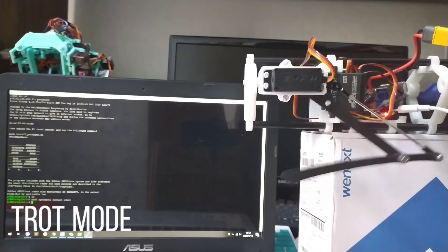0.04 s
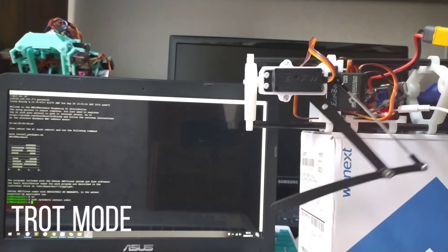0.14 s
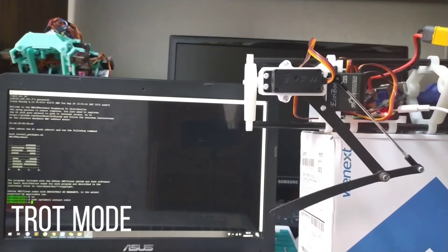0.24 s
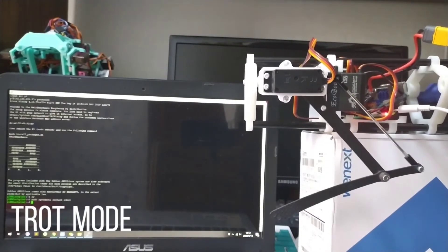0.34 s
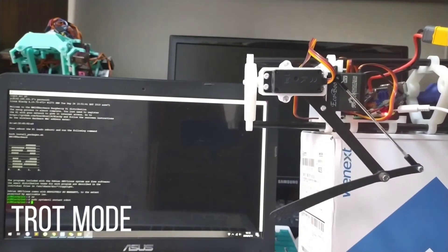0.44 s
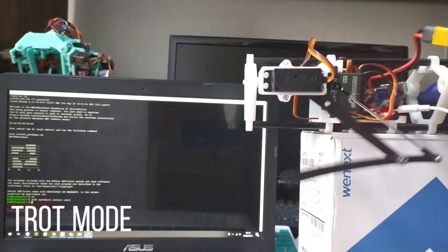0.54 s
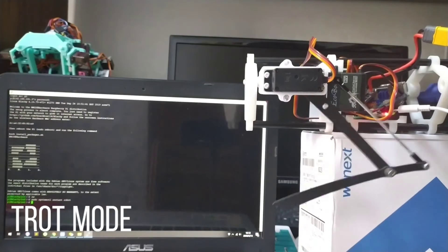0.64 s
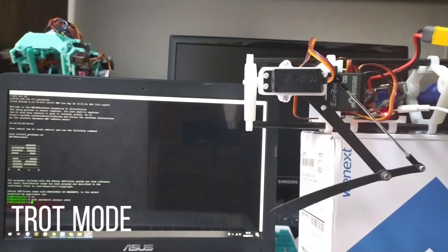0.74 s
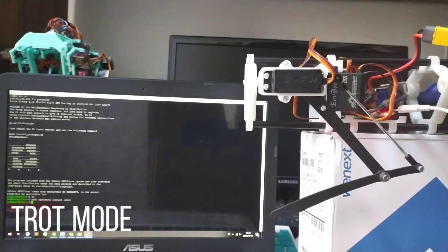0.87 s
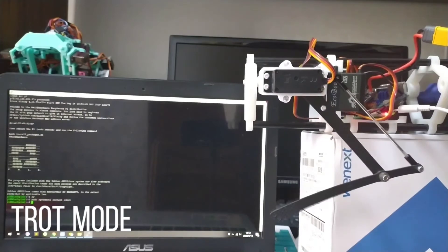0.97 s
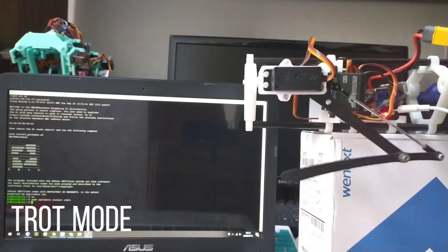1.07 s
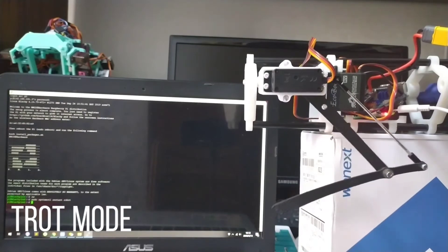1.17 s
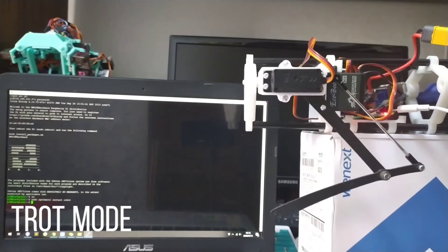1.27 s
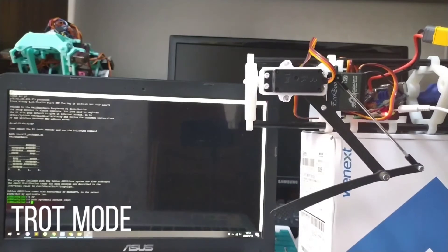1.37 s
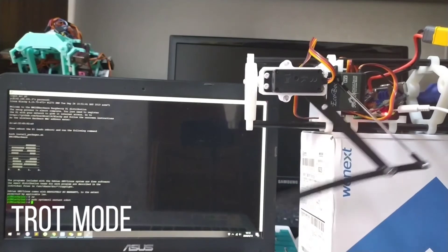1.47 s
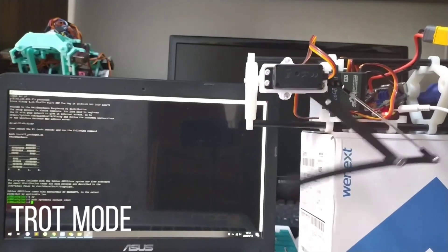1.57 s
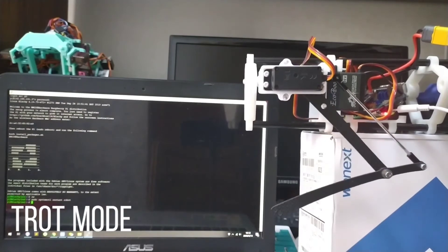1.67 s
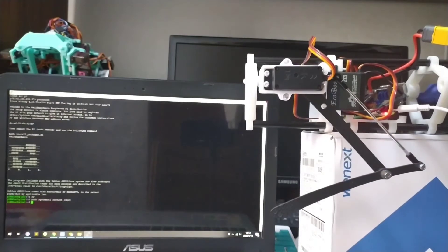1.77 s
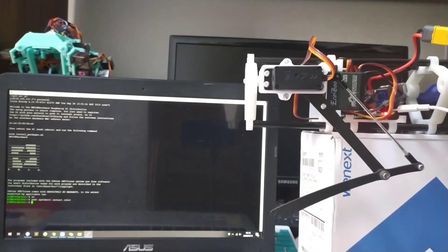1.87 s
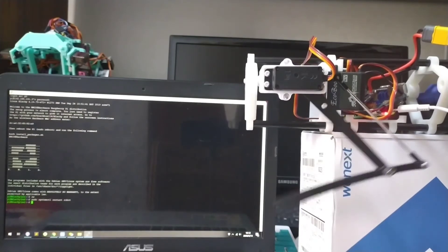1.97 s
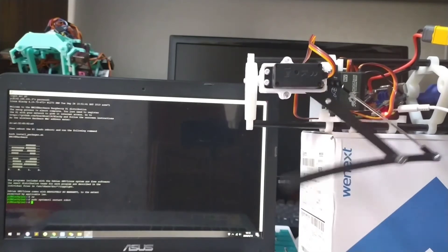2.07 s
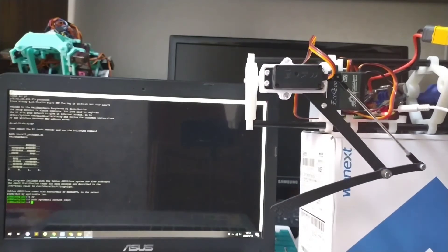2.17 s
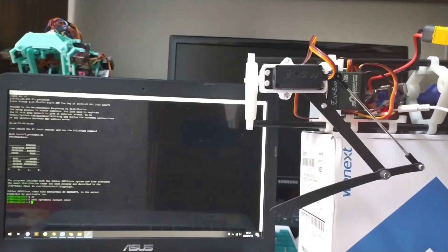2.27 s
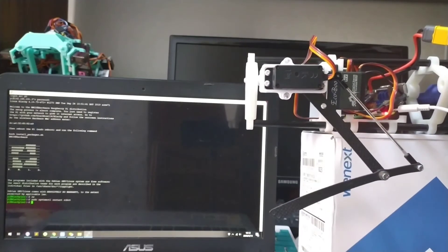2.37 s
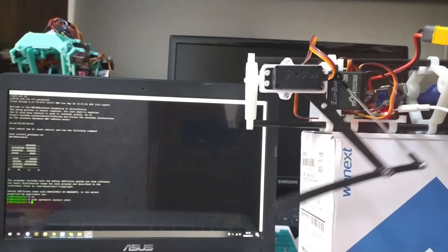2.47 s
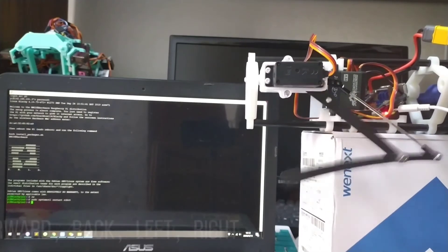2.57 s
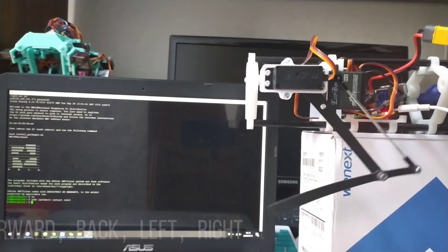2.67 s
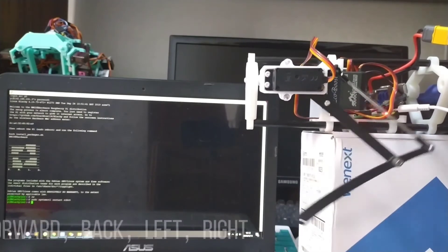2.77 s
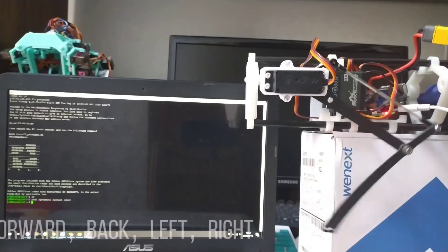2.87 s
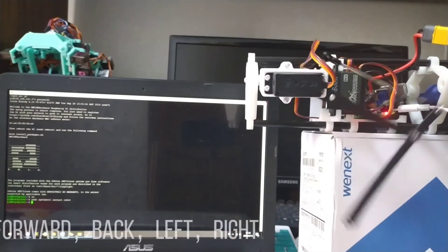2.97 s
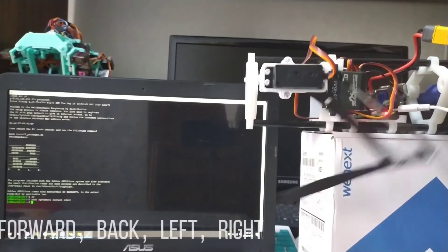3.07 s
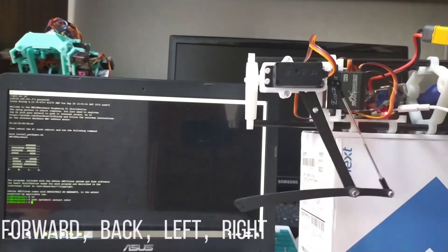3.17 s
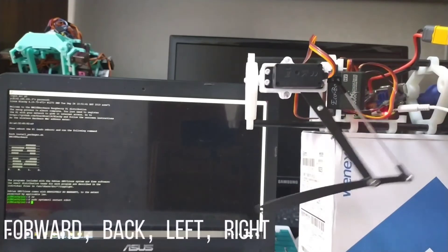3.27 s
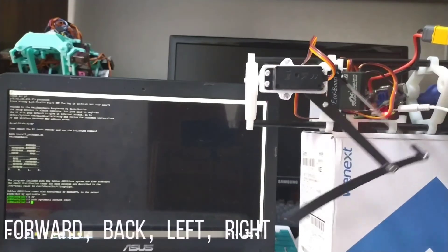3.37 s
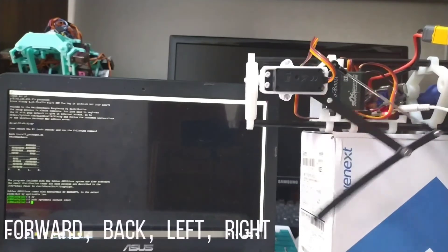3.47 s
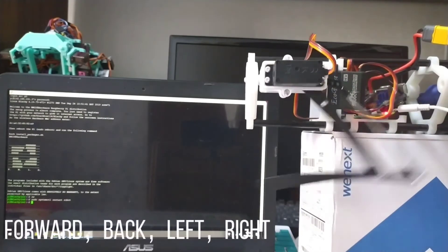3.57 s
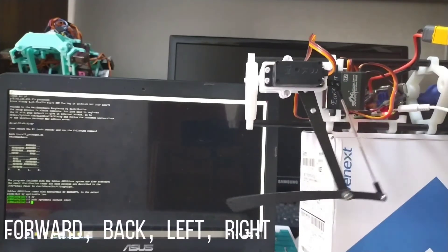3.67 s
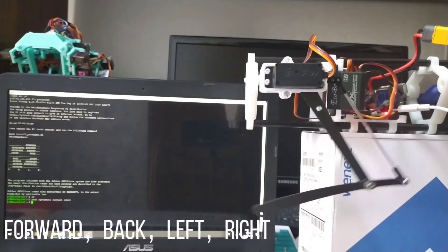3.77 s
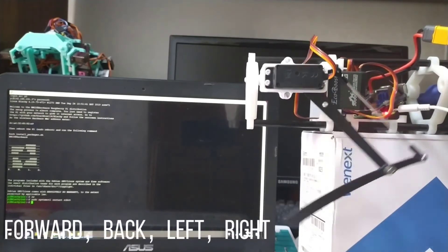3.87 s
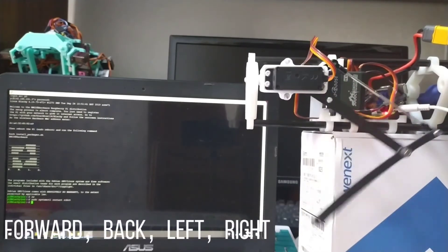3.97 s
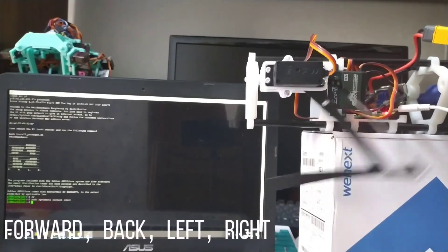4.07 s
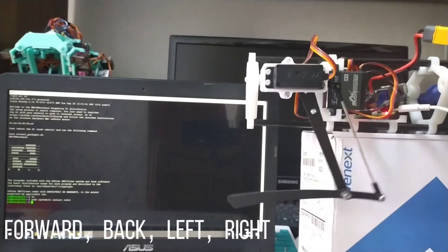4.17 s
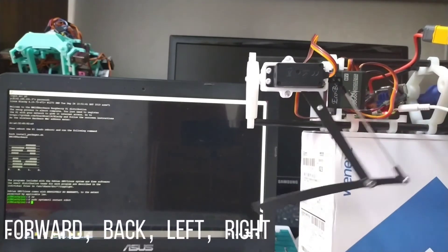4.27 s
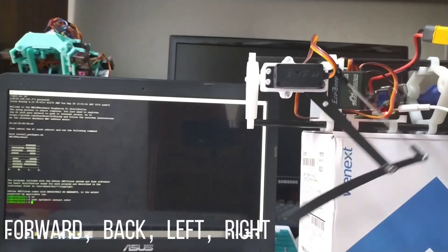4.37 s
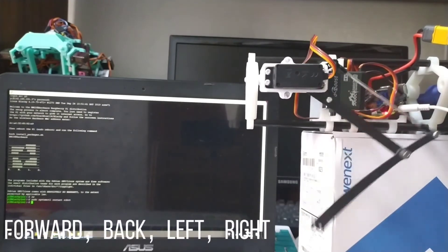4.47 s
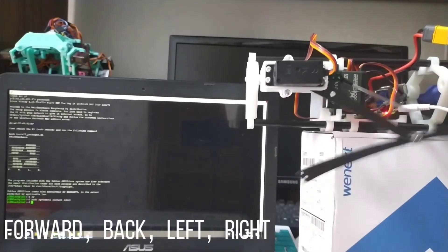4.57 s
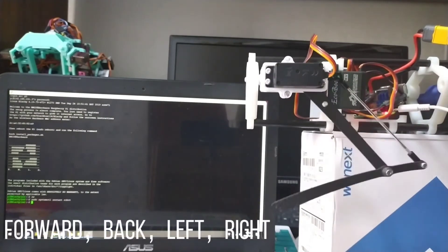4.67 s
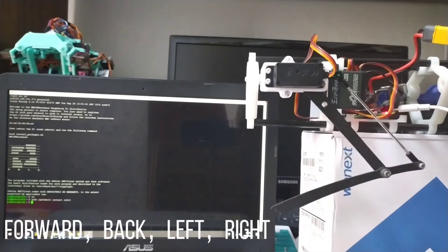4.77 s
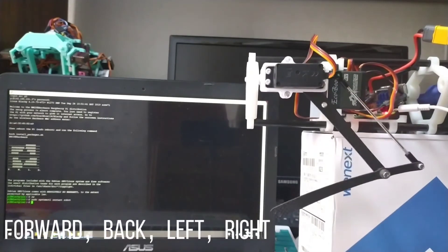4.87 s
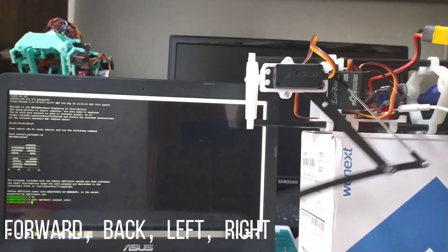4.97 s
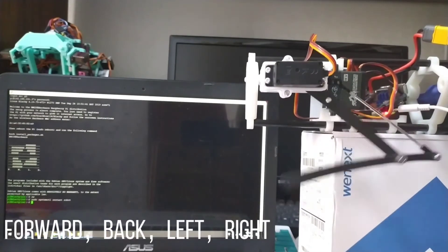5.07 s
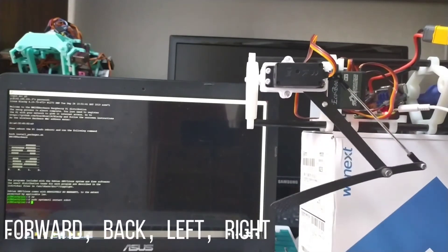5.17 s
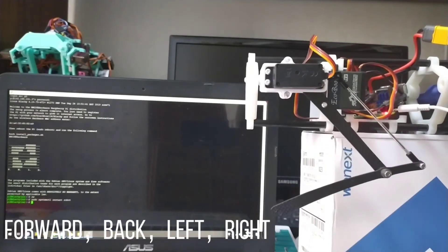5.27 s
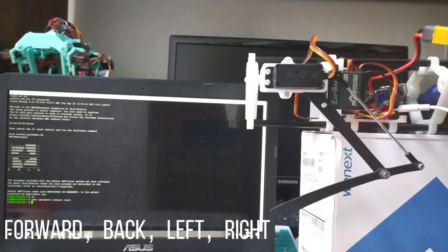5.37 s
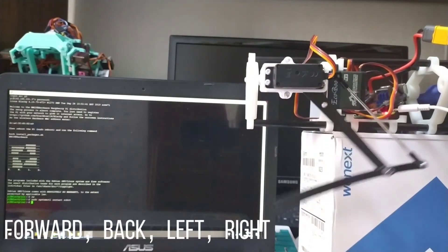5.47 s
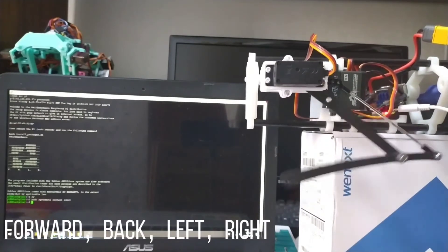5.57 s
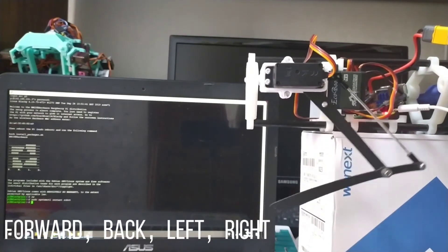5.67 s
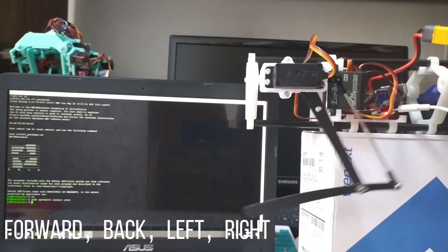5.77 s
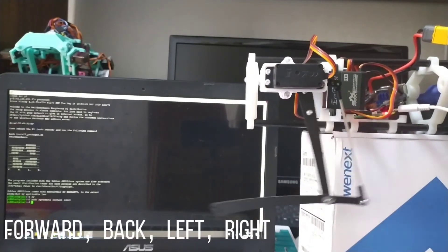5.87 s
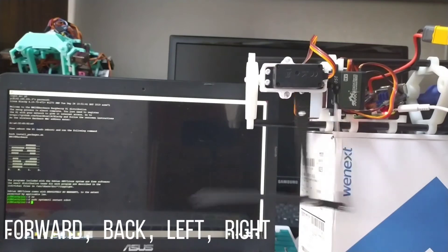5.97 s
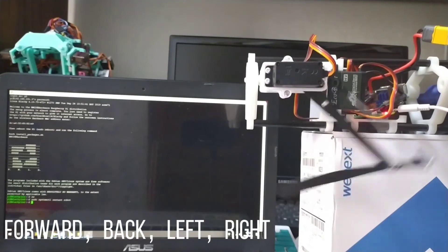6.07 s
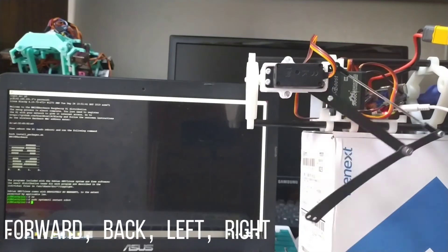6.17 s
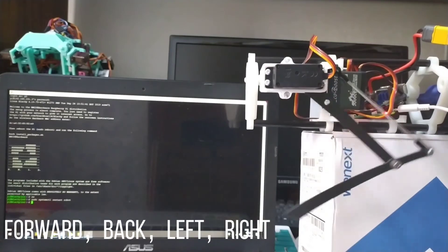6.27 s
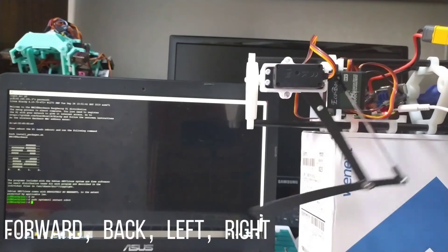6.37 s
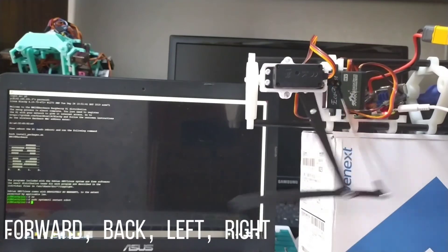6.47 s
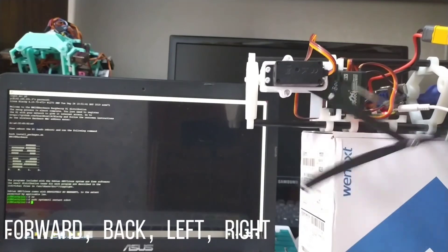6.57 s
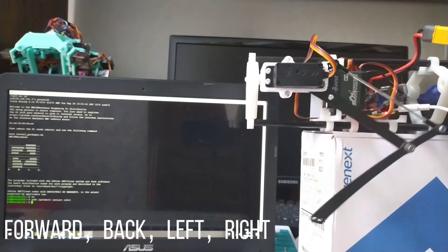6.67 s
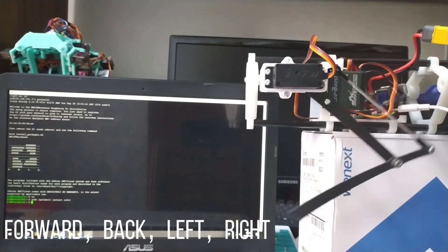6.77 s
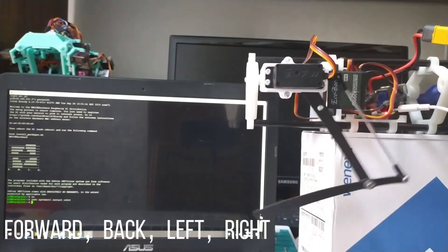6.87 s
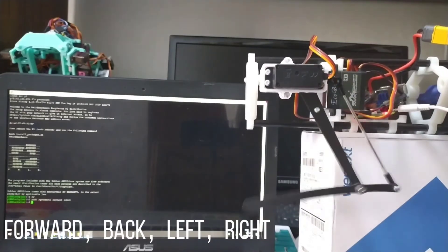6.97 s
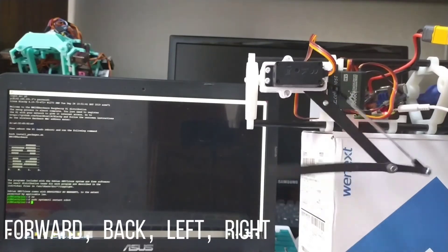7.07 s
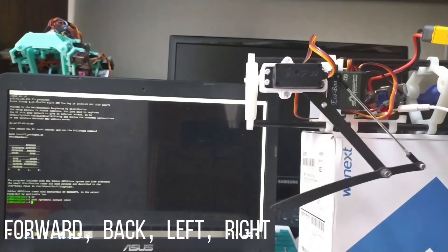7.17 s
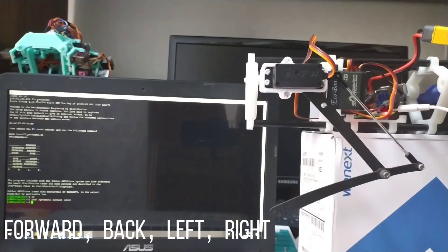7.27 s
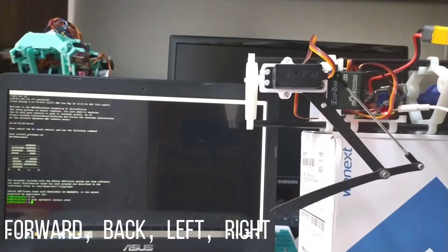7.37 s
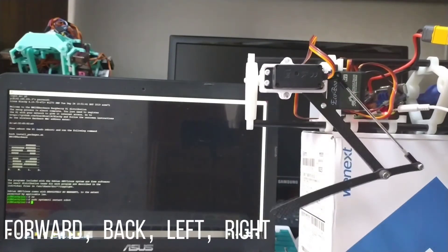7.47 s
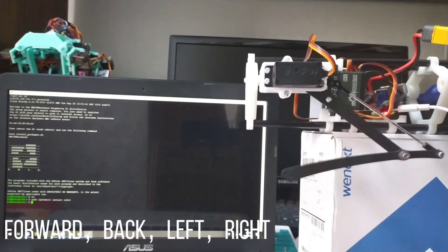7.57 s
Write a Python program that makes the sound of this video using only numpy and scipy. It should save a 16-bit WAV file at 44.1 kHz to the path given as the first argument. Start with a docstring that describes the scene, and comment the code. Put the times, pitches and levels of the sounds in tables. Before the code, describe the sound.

Small servo motors whir in short, rasping bursts as they swing a robot leg, over faint room hum and hiss.

```python
"""Two servos swing a robot leg

Two small geared motors move the leg in short bursts on a bench in a quiet room. Their gear teeth
chatter and make the cases ring, and a rough whine wanders with the speed. The bench shakes with each
move and loose joints knock. Under it all lie room rumble, a wavering hum and microphone hiss."""
import sys
import numpy as np
from scipy import signal
from scipy.fft import rfft, irfft
from scipy.io import wavfile
from scipy.ndimage import map_coordinates

SR = 44100
rng = np.random.default_rng(int(sys.argv[2]) if len(sys.argv) > 2 else 0)


def bounce(signal):
    """Save signal as a 16-bit WAV file at the path given by the first command-line argument."""
    frames = np.transpose(np.atleast_2d(signal))
    limited = np.clip(frames, -1, 1)
    pcm = np.round(limited * 32767).astype(np.int16)
    wavfile.write(sys.argv[1], SR, pcm)


N = 336483
TIME = np.arange(N) / SR


def from_db(db):
    return 10 ** (np.asarray(db) / 20)


def unit_rms(x):
    return x / np.sqrt(np.mean(np.abs(x) ** 2) + 1e-20)


def over_time(rows):
    times, *columns = np.transpose(rows)
    return [np.interp(TIME, times, column) for column in columns]


def over_frequency(rows, hz):
    points_hz, values = np.transpose(rows)
    return np.interp(np.log(hz), np.log(points_hz), values)


def drift(rate_hz, spread_db=None):
    """A smooth random wander of typical size 1, or a wavering gain if a spread is given."""
    pole = np.exp(-64 * np.pi * rate_hz / SR)
    noise = rng.standard_normal(N // 32 + 1002)   # one value for every 32 samples
    slow = unit_rms(signal.lfilter([1], [1, -2 * pole, pole * pole], noise)[1000:])
    if spread_db is not None:
        slow = from_db(spread_db * slow)
    return np.interp(np.arange(N) / 32, np.arange(len(slow)), slow)


def resonate(x, hz, width_hz):
    """Ring at one pitch, with gain 1 there; the narrower the width, the longer the ring."""
    pole = np.exp(-np.pi * width_hz / SR)
    feedback = [1, -2 * pole * np.cos(2 * np.pi * hz / SR), pole * pole]
    return signal.lfilter(np.array([1, 0, -1]) * (1 - pole * pole) / 2, feedback, x)


def room(x, right_lag_samples=0, tail_db=-1.5, t60_s=0.098):
    """Each side hears the direct sound, then its own echo tail, which falls 60 dB in t60_s."""
    t = np.arange(SR // 3) / SR
    response = rng.standard_normal((2, len(t))) * from_db(-60 * t / t60_s) * (t > .002)
    response *= from_db(tail_db) / np.sqrt(np.sum(response ** 2, axis=1, keepdims=True))
    response[[0, 1], [0, right_lag_samples]] += 1   # the direct sound
    response /= np.sqrt(1 + from_db(2 * tail_db))
    return signal.fftconvolve(np.broadcast_to(x, (2, N)), response, axes=1)[:, :N]


# Tone colour of the background noise: f/Hz, relative level/dB
NOISE_SPECTRUM = [(12, -27), (20, 1.5), (33, -12), (50, -12), (70, -14.5), (146, -21.5), (197, -18.5),
                  (297, -19.5), (331, -25), (412, -25), (472, -23), (986, -24.5), (1410, -27), (2630, -31),
                  (6300, -44), (10000, -35), (13500, -45.5)]
# How alike its two sides are: f/Hz, likeness (1 the same, -1 opposite)
NOISE_LIKENESS = [(60, 0.37), (300, 0.57), (700, 0.047), (1400, -0.33), (3000, 0.035)]

def rumble_and_hiss():
    """The room rumbles and the microphone hisses, partly alike on the left and right."""
    hz = np.maximum(np.fft.rfftfreq(N, 1 / SR), 1)
    shared, opposed = rfft(rng.standard_normal((2, N))) * from_db(over_frequency(NOISE_SPECTRUM, hz))
    alike = over_frequency(NOISE_LIKENESS, hz)
    spectrum = np.sqrt(1 + alike) * shared + np.sqrt(1 - alike) * opposed * [[1], [-1]]
    return from_db(-60.5) * unit_rms(irfft(spectrum, N))


def rough_tone(phase, width_hz, steady):
    """A tone whose strength and phase wander; steady is the share that holds still."""
    loose = 1 - steady
    return (steady + loose * drift(width_hz)) * np.cos(phase) + loose * drift(width_hz) * np.sin(phase)


# Loudness of the low hum: t/s, level/dB
HUM_LEVELS = [(0.0, -68), (0.53, -74), (1.13, -66.5), (2.44, -90), (2.72, -72), (3.29, -75), (3.78, -61),
              (4.18, -64.5), (6.06, -69), (6.14, -67.5), (6.35, -60), (6.78, -101), (6.95, -67),
              (7.63, -79)]

def low_hum(hz=60.5):
    """A low, wavering hum swells and fades."""
    tone = rough_tone(2 * np.pi * hz * TIME, width_hz=5.8, steady=0.12)
    return from_db(over_time(HUM_LEVELS)[0]) * unit_rms(tone)


def tooth_clicks(clicks_per_s=5000, spread_db=1.4):
    """Gear teeth touch at random moments, with uneven strength and in clumps."""
    sizes = from_db(spread_db * np.minimum(rng.exponential(1, N), 5)) * rng.choice([-1, 1], N)
    touching = rng.random(N) < clicks_per_s / SR
    return unit_rms(sizes * touching * drift(146.5, 0.4) * drift(25, 1.2))


# Tiny moves of a servo holding its place: start/s, end/s, level/dB
TWITCHES = [(0, 0.02, -58), (0.352, 0.384, -57), (0.454, 0.558, -59.5), (1.39, 1.403, -64.5),
            (1.994, 2.004, -66), (3.284, 3.285, -51)]

def twitches():
    """Light tooth contacts ring only the small parts, so they sound thin and high."""
    high_band = signal.butter(2, [7500, 11500], "band", fs=SR, output="sos")
    thin = signal.sosfilt(high_band, tooth_clicks())
    effort = sum(from_db(db) * np.interp(TIME, [start - .008, start, end, end + 0.028], [0, 1, 1, 0])
                 for start, end, db in TWITCHES)
    return effort * unit_rms(np.array([thin, thin[::-1]]))   # reversed, so the two sides differ


# Bursts of motor drive. The mesh rate is how many gear teeth meet each second; levels are relative.
# start/s, length/s, spin-up/s, chatter/dB, shake/dB, first mesh rate/Hz, last mesh rate/Hz, whine/dB
BURSTS = [ (0, 0.0089, 0.0018, -60, -92, 1420, 1470, -2),
          (.056, 0.065, 0.014, -34.5, -53, 1620, 1570, -0.5),
          (.158, 0.047, 0.0081, -35.5, -54, 1230, 1260, -10), (0.399, .145, 0.067, -59, -76, 1310, 1480, 1),
          (0.558, 0.067, 0.011, -35, -57, 1550, 1500, -4.5),
          (.657, 0.042, 0.0092, -35.5, -51.5, 1600, 1360, -5.5),
          (1.055, 0.071, 0.011, -35, -56.5, 1540, 1510, -5),
          (1.157, 0.038, 0.0083, -36.5, -52, 1580, 1640, -5.5),
          (1.555, 0.064, 0.014, -35.5, -57, 1580, 1390, -2),
          (1.661, 0.036, 0.0073, -35, -58, 1440, 1600, -7),
          (2.058, 0.069, 0.011, -35.5, -57, 1580, 1550, -3),
          (2.16, 0.038, 0.011, -35, -55.5, 1270, 1400, -3.5),
          (2.555, 0.067, 0.014, -35, -57, 1600, 1520, -0.5),
          (2.666, 0.031, 0.0079, -33, -52, 1500, 1400, -12),
          (2.75, 0.15, 0.044, -38.5, -67, 1970, 1430, -4), (2.9, 0.079, 0.011, -39.5, -69, 1680, 1640, -5),
          (2.987, 0.047, 0.0036, -35.5, -58, 1700, 1800, -20),
          (3.056, 0.15, 0.0057, -31.5, -55.5, 2200, 2300, -5),
          (3.27, 0.13, 0.026, -44.5, -79, 1460, 1380, -3),
          (3.4, 0.15, 0.017, -38.5, -67.5, 1850, 1500, -4.5),
          (3.559, .13, 0.0094, -31, -58, 1890, 1890, -9), (3.75, 0.2, 0.029, -43, -74, 1860, 1650, -0.5),
          (3.905, 0.17, 0.0085, -39.5, -65, 1940, 1750, -7),
          (4.061, 0.13, 0.0094, -31.5, -59, 1460, 2040, -21),
          (4.254, 0.13, 0.029, -40.5, -70.5, 1930, 1760, -5),
          (4.42, 0.13, 0.0022, -40, -70, 1700, 1180, -5.5),
          (4.559, 0.067, 0.0069, -33, -55, 1300, 2030, -12.5),
          (4.649, 0.04, 0.009, -34, -56, 1470, 1380, -9),
          (5.056, 0.067, 0.014, -35, -56.5, 1320, 1500, -3.5),
          (5.163, 0.034, 0.0097, -35, -55, 1300, 1680, -4),
          (5.558, 0.061, 0.01, -35.5, -56.5, 1600, 1290, -1.5),
          (5.664, 0.034, .012, -33.5, -51.5, 1200, 1360, -6),
          (5.76, 0.17, 0.044, -39.5, -66.5, 1550, 1590, -0.5),
          (5.93, 0.07, 0.0049, -44, -75, 1380, 1590, -10), (6, 0.022, 0.0098, -41, -66, 1530, 1580, -1.5),
          (6.021, .035, 0.0053, -38, -61.5, 1920, 1780, -5),
          (6.064, 0.16, 0.0036, -32.5, -57, 1720, 2010, -4),
          (6.275, 0.16, 0.033, -41.5, -65.5, 1400, 1320, -3),
          (6.417, 0.14, 0.0092, -39.5, -65.5, 1670, 1640, -2.5),
          (6.562, 0.14, 0.008, -31.5, -58.5, 1730, 1930, -16),
          (6.749, 0.16, .03, -42.5, -66, 1680, 1860, -4.5),
          (6.892, 0.062, 0.013, -37, -59.5, 1550, 1600, 0),
          (7.046, 0.1, 0.011, -35.5, -58.5, 2020, 1600, -0.5),
          (7.151, 0.041, 0.0098, -33, -51.5, 2130, 2200, -12),
          (7.556, 0.091, 0.011, -36, -61.5, 1920, 1120, 0.5)]

def burst_loudness(levels_db, driven_db_per_s, coast_db_per_s, stopped_db=-96):
    """Each burst spins up, sags or builds while driven, then coasts to a stop; their sum in dB."""
    power = np.full(N, from_db(2 * stopped_db))
    for (start, length, spin_up, *_), db in zip(BURSTS, levels_db):
        at = round(start * SR)
        age = np.arange(min(SR // 2, N - at)) / SR
        rise = (1 - np.exp(-age / spin_up)) ** 2.1
        driven_db = driven_db_per_s * np.minimum(age, length)
        coast_db = coast_db_per_s * np.maximum(age - length, 0)
        power[at:at + len(age)] += (from_db(db + driven_db + coast_db) * rise) ** 2
    return 10 * np.log10(power)


def motor_drive(start_dip=.25, catch_up_s=.02):
    """The bursts set chatter, shake, speed and whine; each starts slow and catches up."""
    start, length, _, chatter, shake, first_hz, last_hz, whine = np.transpose(BURSTS)
    chatter_db = burst_loudness(chatter, driven_db_per_s=-8, coast_db_per_s=-310)
    shake_db = burst_loudness(shake, driven_db_per_s=20.5, coast_db_per_s=-266)
    shake_db += 1.5 * drift(15)   # the bench is pushed unevenly
    points = sorted([*zip(start, first_hz, whine), *zip(start + length, last_hz, whine)])
    mesh_hz, whine_db = over_time(points)
    age = TIME - start[np.searchsorted(start, TIME, "right") - 1]   # time since the latest burst began
    mesh_hz *= 1 - start_dip * np.exp(-age / catch_up_s)
    return chatter_db, shake_db, mesh_hz, whine_db


# Strength of the whine at 1 to 5 times the mesh rate: relative level/dB
WHINE_HARMONICS = [-6, -5, -3, -5, -8]

def rough_whine(phase, width_hz=150):
    """Regular tooth contacts whine at multiples of the mesh rate, the higher the rougher."""
    out = np.zeros(N)
    for multiple, db in enumerate(WHINE_HARMONICS, 1):
        gain = from_db(db) * drift(19, spread_db=2)
        out += gain * rough_tone(multiple * phase, np.sqrt(multiple) * width_hz, steady=0.088)
    return from_db(-2.5) * out


def sway(x, delay_s=.0004):
    """A case rocks on its mount, so the sound's travel time wavers and its pitches bend."""
    at = np.arange(N) - delay_s * SR * drift(rate_hz=7)
    return np.array([map_coordinates(side, [at], order=2, mode="nearest") for side in x])


# Pitches at which the cases and gears ring: f/Hz, width/Hz, relative level/dB, left minus right/dB
CASE_RINGS = [(1044, 150, -30, -2.5), (1450, 115, -18, 2.5), (1750, 270, -16, -2.5), (2313, 370, -13, -1),
              (2677, 570, -11.5, 0.5), (3623, 140, -6, -1.5), (4003, 225, -9, -2), (4910, 980, -10, 0),
              (5694, 270, -8, -6.5), (6363, 434, -1.5, 2.5), (6550, 410, -0.5, 4), (6590, 330, -3.5, 4.5),
              (7350, 200, -2, -5), (7630, 160, -3, -1), (8120, 640, -4, 1.5), (9050, 310, -8, -15),
              (9020, 280, 0.5, 3.5), (9310, 430, 1, -4.5), (10090, 530, -5.5, 3.5), (10385, 580, -6.5, 4),
              (11190, 580, -13.5, 3), (12140, 910, -17, 7), (13430, 530, -12.5, 1)]
USUAL_CHATTER_DB = -35   # chatter above this counts as a hard move

def servo(chatter_db, mesh_hz, whine_db, pinion_teeth=7.9):
    """Clicks, whine and snaps from the gears make the servo's case ring."""
    wobble = 1 + .032 * drift(25.09)
    phase = 2 * np.pi * np.cumsum(mesh_hz * wobble) / SR
    # The pinion, the motor's small gear, is slightly off centre: the load swings once a turn.
    load = from_db(chatter_db) * (1 + 0.02 * np.cos(phase / pinion_teeth))
    hits = load * (tooth_clicks() + from_db(whine_db) * rough_whine(phase)) + snaps()
    treble_gain = from_db(0.81 * np.clip(chatter_db - USUAL_CHATTER_DB, -3, 6))
    out = np.zeros((2, N))
    for k, (hz, width_hz, db, side_db) in enumerate(CASE_RINGS):
        ring = resonate(hits, hz, width_hz) * drift(18.7, spread_db=2.6) * (-1) ** k
        if 7200 < hz < 10040:   # hard moves ring these pitches more
            ring *= treble_gain
        out += ring * from_db([[db + side_db / 2], [db - side_db / 2]])
    return from_db(10) * sway(out)


# Narrow dips in pitch that make the servos sound hollow: f/Hz, width/Hz
HOLLOWS = [(2100, 90), (2540, 137), (3250, 46), (4420, 260)]

def hollow_out(x, depth=.8):
    """Weaken a few narrow bands of pitch."""
    for hz, width_hz in HOLLOWS:
        x = x - depth * resonate(x, hz, width_hz)
    return x


# Pitches at which the bench rings: f/Hz, width/Hz, relative level/dB
BENCH_RINGS = [(146.6, 12.5, -1.5), (185.7, 26, 3), (294, 102, -4.5), (332, 64, -2.5), (491, 46, -1),
               (600, 280, -11.5)]

def bench_shake(shake_db, chatter_db):
    """The motors' twisting force shakes the bench; hard moves reach its higher pitches."""
    push = rng.standard_normal(N)
    rings = [from_db(db) * resonate(push, hz, width_hz) * (-1) ** k
             for k, (hz, width_hz, db) in enumerate(BENCH_RINGS)]
    brightness = from_db(.5 * np.clip(chatter_db - USUAL_CHATTER_DB, -8, 8))
    return from_db(shake_db) * unit_rms(sum(rings[:2]) / brightness + sum(rings[2:]) * brightness)


# Snaps inside the gears: t/s, force/dB
SNAPS = [(0.0605, -35), (0.562, -35), (1.060, -41), (1.561, -37), (2.060, -39), (2.561, -36), (2.681, -24),
         (3.074, -21), (5.06, -36), (5.561, -39), (6.0734, -27.5), (7.5606, -37)]

def snaps(t60_s=0.0062):
    """A motor takes up the slack in its gears with a rattle of a few milliseconds."""
    out, age = np.zeros(N), np.arange(SR // 50) / SR
    for start, db in SNAPS:
        at = round(start * SR)
        out[at:at + len(age)] += from_db(db - 60 * age / t60_s) * rng.standard_normal(len(age))
    return out


# Stretches of even running:
# start/s, end/s, first mesh rate/Hz, last mesh rate/Hz, then level/dB of multiples 1 to 5
EVEN_RUNS = [(1.084, 1.11, 1430, 1440, -53, -64, -64, -66, -66),
             (3.093, 3.189, 2000, 1955, -71, -41, -39, -58, -60),
             (0.068, 0.123, 1518, 1670, -53.5, -56, -59, -58, -58),
             (0.575, 0.644, 1395, 1600, -58, -67, -62, -52, -58),
             (3.36, 3.385, 1450, 1450, -51, -56, -70, -70, -70),
             (4.522, 4.6, 1424, 1800, -54.5, -53, -57.5, -54, -62),
             (4.658, 4.69, 1650, 1800, -53, -65, -57, -66, -58),
             (5.865, 5.894, 1667, 1630, -47, -60, -47, -60, -60),
             (5.9, 5.93, 1554, 1400, -54, -58, -52, -60, -54),
             (5.934, 5.981, 1408, 1460, -50.5, -57, -57, -58, -43),
             (5.972, 6.023, 1477, 1610, -50, -57, -48.5, -56, -40),
             (6.016, 6.042, 1743, 1920, -39.5, -53, -49, -57, -66),
             (6.038, 6.061, 1920, 1800, -44, -59, -49, -45, -60),
             (6.074, 6.115, 1725, 1880, -51, -43, -62, -42, -58),
             (6.116, 6.196, 1859, 2010, -54, -42.5, -61, -33, -45),
             (6.442, 6.462, 1750, 1720, -44, -56, -44, -56, -60),
             (7.08, 7.147, 1720, 1810, -47, -55, -62, -60, -60),
             (6.938, 6.973, 1720, 1784, -47, -71, -60, -64, -66),
             (6.462, 6.537, 1606, 1480, -52, -59, -61, -62, -58),
             (6.576, 6.605, 1600, 1860, -69, -50, -63, -51, -54),
             (6.605, 6.65, 1829, 1920, -58, -46, -61, -32, -50),
             (6.649, 6.717, 1945, 2050, -64, -52, -54, -46, -54)]

def clean_whine(fade_s=.006):
    """While a motor runs evenly, five multiples of its mesh rate glide as clear, wavering tones."""
    out = np.zeros(N)
    wobble = 1 + .007 * drift(45)
    flutter = [drift(62, spread_db=2) for _ in range(5)]
    for start, end, first_hz, last_hz, *levels_db in EVEN_RUNS:
        span = np.arange(round((start - fade_s) * SR), round((end + fade_s) * SR))
        mesh_hz = np.interp(span / SR, [start, end], [first_hz, last_hz]) * wobble[span]
        phase = 2 * np.pi * np.cumsum(mesh_hz) / SR
        fade = np.clip(np.minimum(span - span[0], span[-1] - span) / (2 * fade_s * SR), 0, 1)
        for k, db in enumerate(levels_db):
            out[span] += fade * np.sqrt(2) * from_db(db) * flutter[k][span] * np.sin((k + 1) * phase)
    return out


# Knocks in the leg's joints: t/s, level/dB, f/Hz
KNOCKS = [(0.588, -44.5, 767), (1.324, -51, 553.2), (1.715, -46, 538.5), (4.515, -43, 1021),
          (4.564, -45.5, 500.7), (5.153, -52, 519), (5.728, -45, 755), (6.069, -41, 522.3),
          (6.787, -47.5, 774)]

def joint_knocks(t60_s=.035, attack_s=0.0028):
    """Loose joints knock with a short, dull, slightly gritty ring."""
    out, age = np.zeros(N), np.arange(SR // 8) / SR
    for start, db, hz in KNOCKS:
        at = round(start * SR)
        grit = unit_rms(resonate(rng.standard_normal(len(age)), hz, width_hz=hz))
        envelope = from_db(db - 60 * age / t60_s) * np.minimum(age / attack_s, 1)
        out[at:at + len(age)] += envelope * (np.sin(2 * np.pi * hz * age) + .3 * grit)
    return out


# Moments at full speed: start/s, end/s, f/Hz, level/dB
FULL_SPEED_RUNS = [(3.6, 3.642, 356, -60), (4.584, 4.633, 321, -56), (6.122, 6.225, 357.5, -49),
                   (6.616, 6.728, 359.2, -51), (6.617, 6.699, 309, -55.5), (7.182, 7.237, 319, -53)]

def motor_hum():
    """A motor at full speed hums one note, which swells and then drops to almost nothing."""
    out = np.zeros(N)
    for start, end, hz, db in FULL_SPEED_RUNS:
        swell = np.interp(TIME, [start - .02, start, end, end + 0.013], [0.013, 0.63, 1, 0.00187])
        out += from_db(db) * swell * np.sin(2 * np.pi * hz * TIME)
    return out


def scene():
    """Both servos follow the same bursts from slightly different places on the bench."""
    chatter_db, shake_db, mesh_hz, whine_db = motor_drive()
    bench = bench_shake(shake_db, chatter_db) + motor_hum()
    out = rumble_and_hiss() + twitches()
    out += room(bench + joint_knocks(), tail_db=-7)   # long waves reach both sides nearly alike
    out += low_hum()
    first_servo = room(servo(chatter_db, mesh_hz, whine_db), right_lag_samples=1)
    # As the load falls, the second servo slows and its whine fades less than its chatter.
    load_db = np.minimum(chatter_db - USUAL_CHATTER_DB, 0)
    second_hz = 1904 * from_db(0.5 * load_db)
    second_whine_db = -11.5 - 0.5 * load_db
    second_servo = room(servo(chatter_db, second_hz, second_whine_db), right_lag_samples=9)
    out += hollow_out(first_servo + second_servo)
    return out + room(clean_whine(), right_lag_samples=9, tail_db=-9.5)


def record(dry, whistle_hz=15440, cutoff_hz=15750):
    """The highest treble is dulled but for one thin, faint whistle; the very top is cut."""
    whistle = resonate(resonate(dry, whistle_hz, 110), whistle_hz, 110)
    dulled = signal.sosfilt(signal.butter(8, 12000, fs=SR, output="sos"), dry)
    heard = dulled + from_db(-20) * dry + from_db(9) * whistle
    return signal.sosfilt(signal.ellip(12, .5, 70, cutoff_hz, fs=SR, output="sos"), heard)


dry = scene()
out = record(dry)
bounce(out)
```